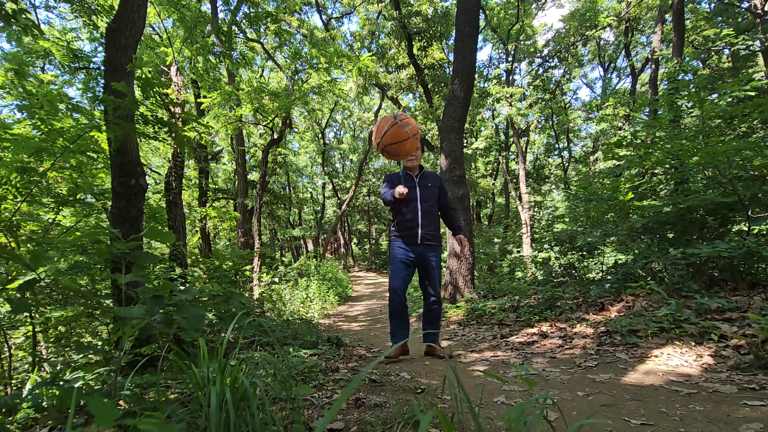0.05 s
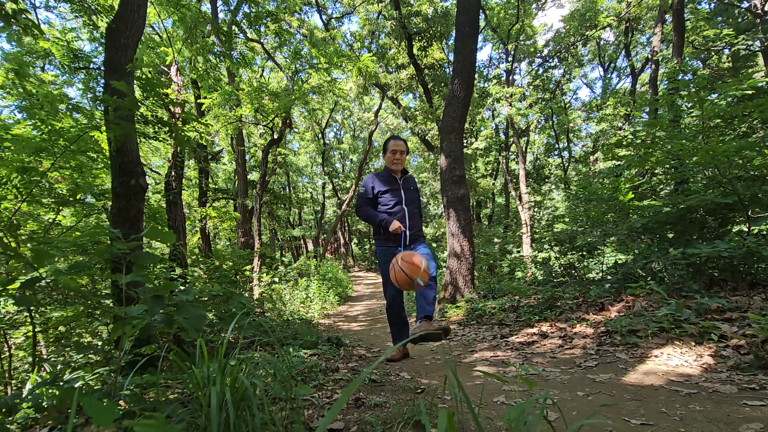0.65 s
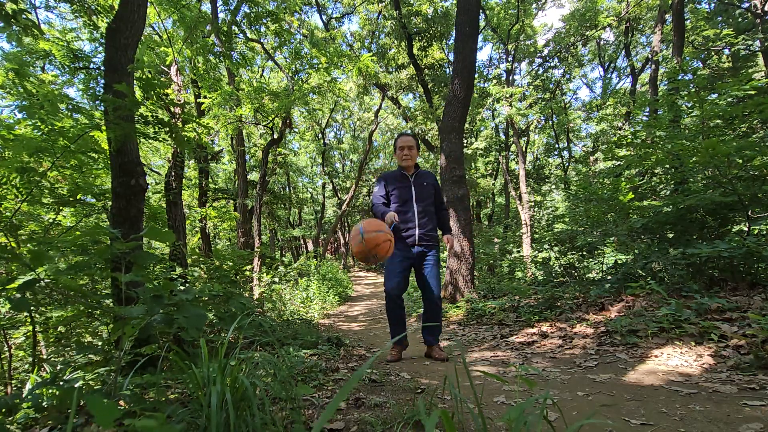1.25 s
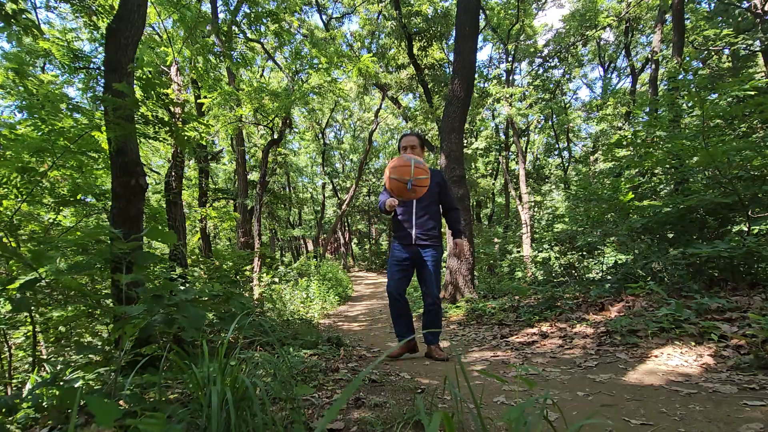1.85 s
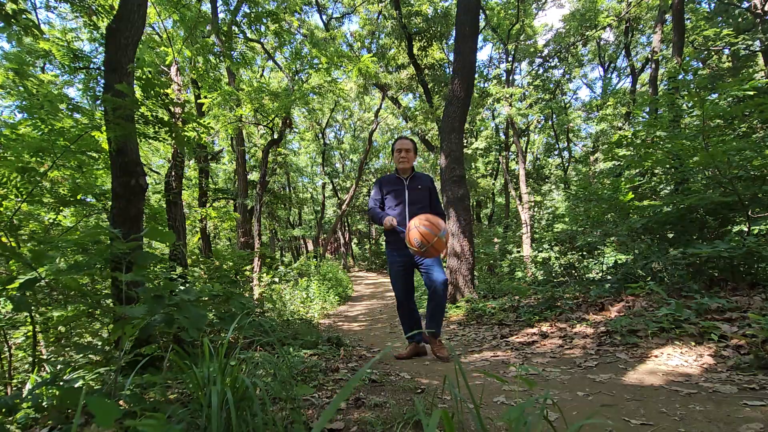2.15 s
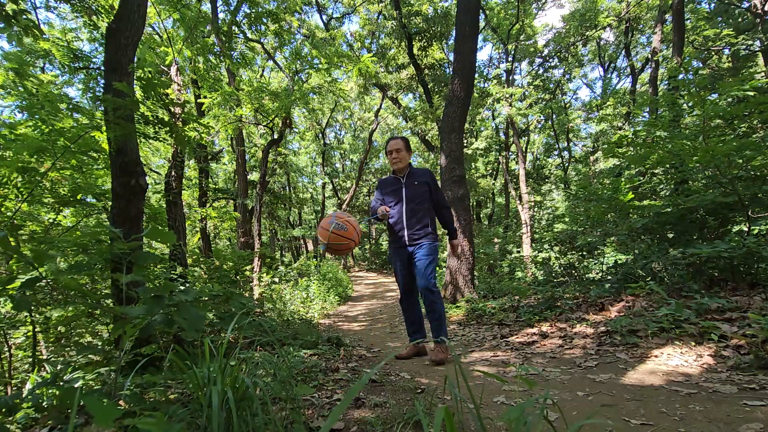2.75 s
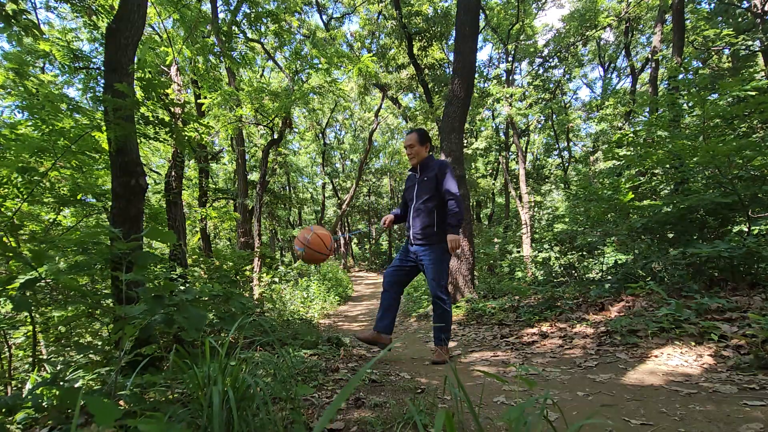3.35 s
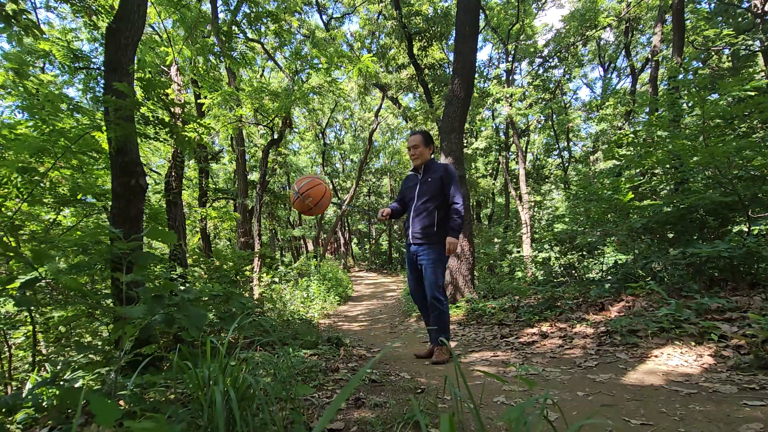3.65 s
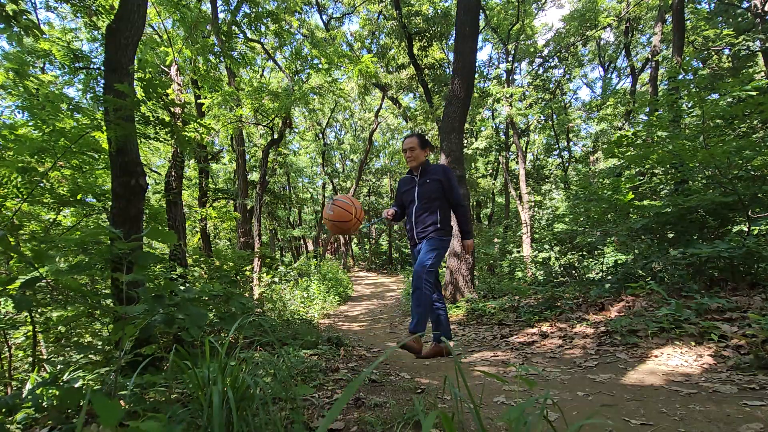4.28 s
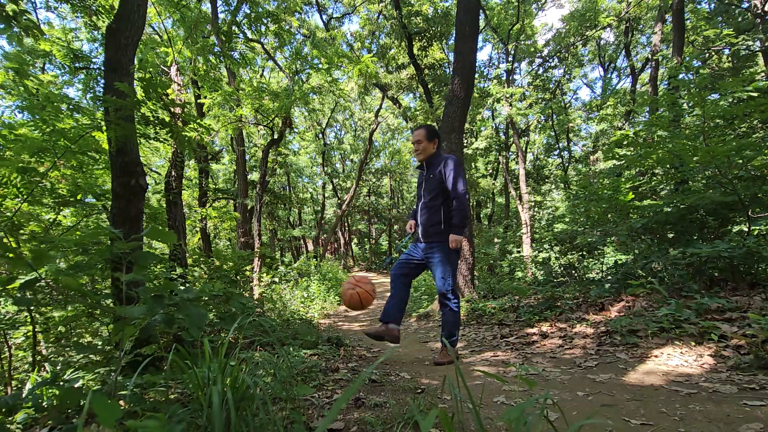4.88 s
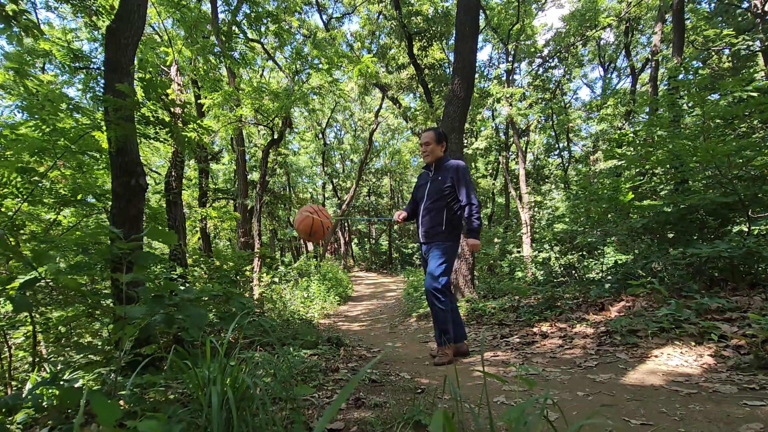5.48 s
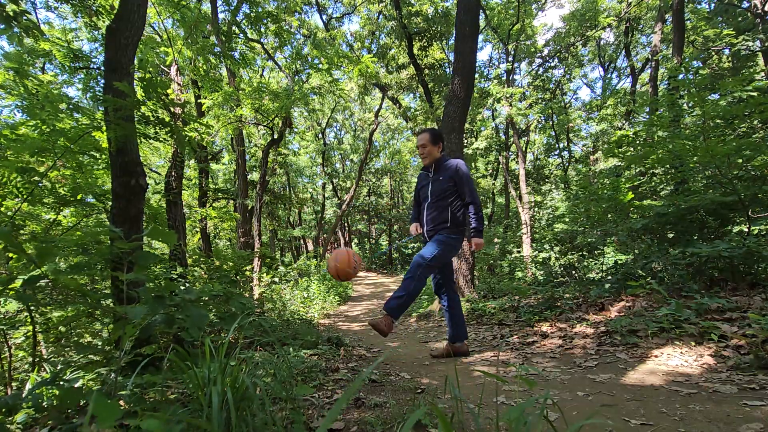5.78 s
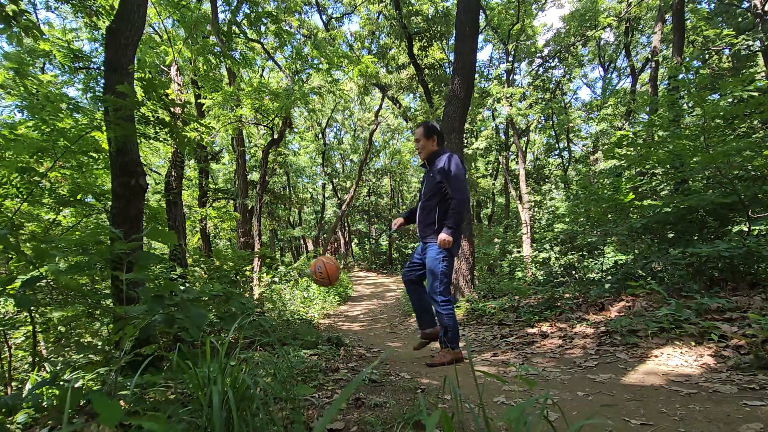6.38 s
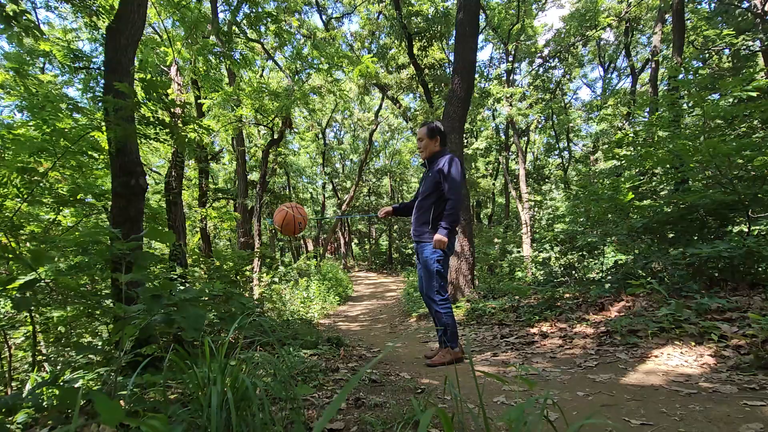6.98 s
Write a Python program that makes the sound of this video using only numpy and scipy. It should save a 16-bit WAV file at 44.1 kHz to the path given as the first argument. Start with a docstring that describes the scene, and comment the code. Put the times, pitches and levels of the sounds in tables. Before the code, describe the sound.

A basketball is kicked eight times in a steady rhythm, each a sharp slap and thump, on a quiet forest trail with faint birds.

```python
"""A basketball hanging on a cord is kicked eight times in a steady rhythm by a man on a forest trail.
Each kick is a leathery slap, a deep thump as the shoe dents the rubber, and a faint ping of the air
inside; undergrowth and trunks scatter it back. Between kicks the cord snaps taut with a dull tug,
and his nylon jacket sleeve rustles. Twigs and dry leaves tick underfoot, and thin birds call over
hissing leaves and a distant rumble."""
import sys
import numpy as np
from scipy import signal
from scipy.fft import rfft, irfft, next_fast_len
from scipy.io import wavfile
from scipy.ndimage import map_coordinates

SR = 44100
rng = np.random.default_rng(int(sys.argv[2]) if len(sys.argv) > 2 else 0)


def master_out(mix):
    """Clip the mix to full scale and print it as 16-bit PCM to the path in sys.argv[1]."""
    frames = np.transpose(np.atleast_2d(mix))
    ceiling = np.clip(frames, -1, 1)
    pcm = np.round(ceiling * 32767).astype(np.int16)
    wavfile.write(sys.argv[1], SR, pcm)


N = 314433
CONTACT_S = 0.0167  # how long the shoe touches the ball


def kicks():
    """Each kick layers a slap, a thump and a knock, then the rubber shell and the air inside ring on."""
    # (time [s], strength [dB], shoe angle [0 flat, 1 toe], shell ring [dB], ping [dB],
    #  ping tilt [dB/octave], ping sustain [factor])
    blows = [(0.6804, -15.5, 0.4, -40, -40, -8, 1.1), (1.5615, -17, 0.11, -30.5, -42, -11, 1.04),
             (2.4174, -20.5, 0.29, -34, -43.5, -10, 0.66), (3.243, -19.5, 0, -28, -49, -4, 0.65),
             (4.1002, -18, .95, -25, -52, -24, 1.2), (4.9292, -17.5, 0.05, -27.5, -54, -2, 0.55),
             (5.7948, -19, 1, -32, -58.5, -12, 6.2), (6.616, -17.3, 0.61, -41, -44, 7, 0.34)]
    # modes of the rubber shell: (frequency [Hz], relative level [dB], t60 [s])
    shell_modes = [(229.6, -2.5, 0.083), (296.8, 1.5, 0.15), (374, -1, 0.065), (508, -2, 0.07),
                   (590, -1.5, 0.059), (825, -2.5, 0.079), (1040, -6, 0.055)]
    out, t = np.zeros((2, N)), np.arange(SR) / SR
    for start, db, toe, shell_db, ping_db, tilt_db, sustain in blows:
        slap, slap_all_round = shoe_slap(t, db, toe)
        boom = amp(db + 10) * thump(t - by_shoe(toe, 0.0033, 0.0045))  # the toe sinks in later
        knock = rubber_knock(t, db, toe)
        shell = amp(shell_db) * ring(t - 0.0075, shell_modes, scatter_db=3)
        ping = air_ping(t, ping_db, tilt_db, sustain)
        body = boom + knock + shell
        all_round = slap_all_round + amp(-5.5) * body + amp(-2.5) * ping
        add(out, start - 0.001, on_trail(slap + body + ping, all_round))
    return out


def shoe_slap(t, db, toe):
    """Shoe on rubber: the flat slaps, the toe cracks. Gives the direct sound and that sent all round."""
    # leathery body of the slap: (frequency [Hz], relative level [dB])
    slap_spectrum = [(150, -22), (400, 8.5), (700, -0.5), (1300, -1), (1600, -2), (1900, -10.5),
                     (3000, -23.5), (9000, -41)]
    # sizzle on top of it: (frequency [Hz], relative level [dB])
    sizzle_spectrum = [(2500, -40), (4500, -14), (5600, -3.5), (7500, -1), (9000, -11), (11500, -12),
                       (13000, -16), (16000, -25)]

    def skin_db(hz):
        slap = amp(by_shoe(toe, 28, 18.5) + along(slap_spectrum, hz))
        crack = amp(by_shoe(toe, 20, 25.5) + hump(hz, by_shoe(toe, 3380, 2710), focus_db=24.5))
        sizzle = amp(by_shoe(toe, 10, 13) + along(sizzle_spectrum, hz))
        return db + 20 * np.log10(slap + crack + sizzle)

    graze = amp(-8.5) * snap(swell(t, crest_s=0.0013))
    strike = snap(swell(t - 0.0013, crest_s=0.0014), passes=1)
    release_scuff = amp(-18.5) * snap(swell(t - CONTACT_S * 0.676, crest_s=0.0029))
    direct = coloured(graze + strike + release_scuff, skin_db)
    all_round = coloured(1.0 * (t == 0), skin_db)  # summed over all directions, the spectrum is smooth
    return direct, all_round


def thump(t):
    """The shoe dents the ball and lets go; the air feels the acceleration of the dent."""
    stiffness, skew, low_cut_hz = 3.92, 0.85, 56
    progress = np.clip(t / CONTACT_S, 0, 1)
    dent = np.abs(np.sin(np.pi * progress ** skew)) ** stiffness
    push = np.gradient(np.gradient(dent))
    push = signal.sosfilt(signal.butter(2, low_cut_hz, "high", fs=SR, output="sos"), push)
    return push / np.abs(push).max()


def rubber_knock(t, db, toe):
    """The rubber under the shoe buckles inwards, heavily damped, and flaps back as the ball leaves."""
    thud_db, knock_db = db + by_shoe(toe, -4.5, 7), db + by_shoe(toe, -5, -4)
    # modes of the struck patch: (frequency [Hz], level [dB], t60 [s])
    patch_modes = [(225, thud_db, 0.022), (410, thud_db - 4, 0.018),
                   (520, knock_db - 3, 0.018), (809, knock_db + 5.5, 0.022)]
    buckle = -ring(t - 0.0014, patch_modes, scatter_db=1.5)
    release = swell(t - CONTACT_S * 0.55, crest_s=0.0046)
    flap = amp(knock_db - 9.5) * burst(release, lambda hz: hump(hz, centre_hz=583, focus_db=12.5))
    return buckle + flap


def air_ping(t, db, tilt_db, sustain):
    """The air trapped in the ball rings, wavering as the ball turns in flight."""
    # air modes: (frequency [Hz], relative level [dB], t60 before the sustain factor [s])
    air_modes = [(795, -1, 0.3), (1614, 6.5, 0.26), (2116, -11, 1.5), (2170, -1, 0.27), (2800, -17, 0.93),
                 (3208, -22, .25)]
    tilt_above_hz = air_modes[1][0]
    modes = [(hz, level + tilt_db * np.log2(max(hz / tilt_above_hz, 1)), t60 * sustain)
             for hz, level, t60 in air_modes]
    flutter_db = 1.9 * wobble(26)[:len(t)]
    return amp(db - 4 + flutter_db) * ring(t - 0.0025, modes, scatter_db=1.5)


def cord_and_sleeve():
    """The cord snaps taut with a dull tug, and his jacket sleeve rustles."""
    # (time [s], rustle length [s], rustle [dB], tug [dB], rustle crest [share of length])
    jerks = [(0.222, 0.033, -48.5, -45, .4), (1.115, 0.057, -43, -42.5, 0), (2.007, 0.046, -45, -43.5, .75),
             (2.88, 0.07, -45.5, -45.5, 0.67), (3.706, 0.057, -45.5, -43.5, 0.4),
             (4.557, 0.058, -39.5, -52, 0.27), (5.436, 0.05, -56, -44.5, 0.7),
             (6.216, 0.042, -39, -40, .15), (7.065, 0.043, -49.5, -33.5, 0.2)]
    # colour of the tug: (frequency [Hz], relative level [dB])
    tug_spectrum = [(60, 9.5), (150, 1), (350, -4.5), (650, -3), (1500, -19), (5000, -36), (16000, -47)]
    out, t = np.zeros((2, N)), np.arange(SR // 2) / SR
    for start, length, rustle_db, tug_db, crest in jerks:
        rustle = sleeve_rustle(t / length, rustle_db, crest)
        tug = amp(tug_db + 4) * burst(swell(t, crest_s=0.0032), lambda hz: along(tug_spectrum, hz))
        add(out, start, on_trail(rustle + tug, rustle + tug))
    return out


def sleeve_rustle(progress, db, crest):
    """The nylon sleeve swishes: a broad, grainy rasp with a narrow band that stands out at its crest."""
    # colour of the rasp before its tilt: (frequency [Hz], relative level [dB])
    rasp_spectrum = [(120, 1.5), (400, 4.5), (900, -3), (1400, 1), (2200, -3.5), (3200, -2.5), (6000, -9.5),
                     (9500, -11), (12000, -19.5), (16000, -22)]
    tilt_db_per_octave = -0.62
    rasp_colour = lambda hz: along(rasp_spectrum, hz) + tilt_db_per_octave * np.log2(hz + 1)
    stages = [0, 0.06, np.clip(crest, 0.1, 0.88), 0.9, 1.15]
    swish = np.interp(progress, stages, [0.11, 0.38, 1, 0.41, 0.026])
    grain = amp(4.04 * wobble(356)[:len(progress)])
    rasp = amp(db - 1.2) * burst(swish * grain, rasp_colour)
    band = amp(db - 5) * burst(swish ** 2 * grain, lambda hz: hump(hz, centre_hz=2040, focus_db=113))
    return rasp + band


def litter():
    """Twigs and dry leaves tick as he shifts his feet; the louder the snap, the shorter it is."""
    # (time [s], relative level [dB], centre frequency [Hz])
    ticks = [(0.497, -52, 6000), (1.253, -48, 7500), (1.418, -62.5, 9000), (2.1, -59, 7000),
             (3.112, -60, 11000), (3.922, -45.5, 7040), (5.009, -30, 3000), (5.641, -37.5, 6400),
             (6.714, -51, 3470)]
    loud_crest_s, loud_db, db_per_doubling = 0.00097, -25, 16
    out, t = np.zeros((2, N)), np.arange(SR // 4) / SR
    for start, db, centre_hz in ticks:
        crest_s = loud_crest_s * 2 ** ((loud_db - db) / db_per_doubling)
        tick = amp(db - 9.5) * burst(swell(t, crest_s), lambda hz: hump(hz, centre_hz, focus_db=11))
        add(out, start, on_trail(tick, amp(-2) * tick))
    return out


def birds():
    """Far birds give thin falling whistles, blurred by their way through the trees."""
    # (time [s], length [s], pitch [Hz], relative level [dB])
    calls = [(0, 0.15, 7360, -72), (1.474, .1, 4520, -66), (1.64, .26, 7230, -70.5),
             (1.675, 0.34, 2540, -58.5), (1.694, .34, 4320, -65), (2.56, .24, 6970, -76),
             (3.36, 0.19, 7450, -72), (3.55, 0.19, 5400, -69), (5.87, .15, 7800, -73),
             (5.996, 0.35, 7400, -70), (6.079, 0.22, 2950, -58.5), (6.829, .22, 8100, -71)]
    # smear around each whistle: (pitch [Hz], half-width [Hz])
    blur = [(2800, 440), (5400, 80), (7500, 70)]
    fall_hz_per_s = 1100
    out = np.zeros((2, N))
    for start, length, pitch_hz, db in calls:
        n = int(length * SR)
        glide_hz = pitch_hz - fall_hz_per_s * (np.arange(n) / SR - length / 2)
        whistle = np.exp(2j * np.pi * np.cumsum(glide_hz) / SR)
        blur_hz = along(blur, pitch_hz)
        paths = filtered(rng.standard_normal((2, 2, n)), lambda hz: 1 / (1 + (hz / blur_hz) ** 2))
        call = np.real((paths[0] + 1j * paths[1]) * whistle)
        fade = np.sin(np.linspace(0, np.pi, n))
        add(out, start, amp(db - 3.5) * unit(call) * fade)
    return out


def forest():
    """A steady distant rumble under the soft hiss of leaves, which follows the breeze."""
    # colour of the rumble: (frequency [Hz], relative level [dB])
    rumble_spectrum = [(12, -52), (20, -11.5), (43, -3.5), (70, -0.5), (135, -11.5), (242, -15), (273, -18),
                       (437, -32), (500, -29), (650, -45), (1100, -120)]
    # colour of the leaves: (frequency [Hz], relative level [dB])
    leaf_spectrum = [(200, -14), (450, 2.5), (800, -3), (1300, -1.5), (2100, -6), (3000, -12.5),
                     (4300, -13), (5500, -19.5), (7500, -21), (9500, -23.5), (10700, -33.5), (16000, -32)]
    # rise and fall of the hiss: (time [s], relative level [dB])
    breeze = [(0.0, -61.5), (1.63, -61), (4.29, -61), (6.19, -58.5), (7.13, -59.5)]

    def bed(spectrum):
        noise = diffuse(rng.standard_normal((2, N)))
        return unit(filtered(noise, lambda hz: amp(along(spectrum, hz))))

    hiss_db = np.interp(np.arange(N) / SR, *np.transpose(breeze))
    rumble = amp(-46 + wobble(5.6)) * bed(rumble_spectrum)
    hiss = amp(hiss_db + 1 + wobble(2.02) / 2) * bed(leaf_spectrum)
    return rumble + hiss


def on_trail(direct, all_round):
    """The direct sound goes straight to the microphone; undergrowth and trunks scatter the rest."""
    # stereo width of the direct sound: (frequency [Hz], side over mid [dB])
    width = [(200, -32), (500, -22), (1000, -20), (3000, -13.5), (5000, -5.5), (8000, -2.5), (14000, 1)]
    # decay of the near and far echoes: (frequency [Hz], t60 [s])
    undergrowth_decay = [(100, 0.19), (500, 0.14), (2500, 0.17), (8000, 0.15), (15000, 0.17)]
    trunk_decay = [(100, 0.8), (700, 0.76), (2500, 0.64), (6000, 0.56), (14000, 0.45)]
    # colour of those echoes: (frequency [Hz], level [dB])
    undergrowth_colour = [(80, -30), (250, -4), (700, -7.5), (2500, -6.5), (7000, -3), (14000, 3)]
    trunk_colour = [(80, -21.5), (250, -25.5), (800, -17), (2500, -15), (7000, -9.5), (14000, -11)]
    # the microphone's two ports differ in phase
    side = filtered(direct, lambda hz: -1j * amp(along(width, hz)))
    near = echo_tail(undergrowth_decay, undergrowth_colour, onset_s=0.0023)
    far = echo_tail(trunk_decay, trunk_colour, onset_s=0.033)
    echoes = signal.fftconvolve(all_round[None], near + far, axes=1)[:, :len(direct)]
    return np.array([direct + side, direct - side]) + echoes


def echo_tail(decay, colour, onset_s):
    """A stereo echo whose frequencies die at their own speeds."""
    hz, t, noise = signal.stft(rng.standard_normal((2, SR)), SR, nperseg=256)
    t60 = along(decay, hz)[:, None]
    equal_energy = np.sqrt(np.log(10 ** 6) / (t60 * SR))
    gain = amp(along(colour, hz)[:, None] - 60 * t / t60) * equal_energy
    echo = signal.istft(noise * gain, SR, nperseg=256)[1][:, :SR]
    fade_in = 1 - np.exp(-(np.arange(SR) / SR / onset_s) ** 2)
    return diffuse(echo * fade_in)


def diffuse(pair):
    """Two unrelated signals become a field that is near mono in the bass and wide in the treble."""
    # (frequency [Hz], left-right correlation [-1 to 1])
    likeness = [(60, 0.96), (180, 0.96), (550, 0.46), (1650, -0.21), (4970, 0.1), (15000, -0.074)]
    angle = lambda hz: np.arccos(along(likeness, hz)) / 2
    mid, side = filtered(pair, lambda hz: np.array([np.cos(angle(hz)), np.sin(angle(hz))]))
    return np.array([mid + side, mid - side])


def by_shoe(toe, flat_value, toe_value):
    """Blend a setting from the flat of the shoe (0) to its toe (1)."""
    return np.interp(toe, [0, 1], [flat_value, toe_value])


def ring(t, modes, scatter_db):
    """Damped modes, struck at new strengths; neighbours swing in opposite directions."""
    t = np.maximum(t, 0)
    out = np.zeros(len(t))
    for k, (hz, db, t60) in enumerate(modes):
        envelope = amp(db + scatter_db * rng.standard_normal() - 60 * t / t60)
        out += (-1) ** k * envelope * np.sin(2 * np.pi * hz * t)
    return out


def snap(envelope, passes=3):
    """A brief noise of energy 1; each pass evens out the holes in its spectrum."""
    x = rng.standard_normal(len(envelope))
    for _ in range(passes):
        spectrum = rfft(x * np.sqrt(envelope))
        x = irfft(spectrum / (np.abs(spectrum) + 1e-9), len(x))
    x = x * np.sqrt(envelope)
    return x / np.linalg.norm(x)


def burst(envelope, level_db):
    """Coloured noise whose rms follows the envelope."""
    x = coloured(envelope * rng.standard_normal(len(envelope)), level_db)
    return x * np.linalg.norm(envelope) / (np.linalg.norm(x) + 1e-12)


def swell(t, crest_s):
    """Rises from t = 0 to 1 at the crest and dies away."""
    u = np.maximum(t, 0) / crest_s
    return (u * np.exp(1 - u)) ** 2


def wobble(rate):
    """A smooth random curve, rate knots a second."""
    knots = rng.standard_normal(int(N * rate / SR) + 4)
    return map_coordinates(knots, [np.arange(N) * rate / SR])


def coloured(x, level_db, size=2048):
    """Causal filter with the gain level_db(Hz), so that nothing sounds before a blow."""
    cepstrum = irfft(level_db(np.fft.rfftfreq(size, 1 / SR)) * np.log(10) / 20)
    cepstrum[1:size // 2] *= 2
    cepstrum[size // 2 + 1:] = 0
    impulse_response = irfft(np.exp(rfft(cepstrum)))
    return signal.fftconvolve(x, impulse_response)[:len(x)]


def filtered(x, response):
    """Shape the spectrum of x by the gain response(Hz)."""
    n = x.shape[-1]
    size = next_fast_len(n + SR // 4)
    return irfft(rfft(x, size) * response(np.fft.rfftfreq(size, 1 / SR)), size)[..., :n]


def hump(hz, centre_hz, focus_db):
    """A peak in dB that falls by focus_db times the squared distance in octaves, 45 dB at most."""
    return -np.minimum(focus_db * np.log2((hz + 1) / centre_hz) ** 2, 45)


def along(points, hz):
    """Read a curve of (frequency [Hz], value) points on a log axis."""
    frequencies, values = np.transpose(points)
    return np.interp(np.log(hz + 1), np.log(frequencies), values)


def amp(db):
    """Decibels to gain."""
    return 10 ** (np.asarray(db) / 20)


def unit(x):
    """Scale to rms 1."""
    return x / np.sqrt(np.mean(x ** 2) + 1e-20)


def add(track, start_s, x):
    """Mix x into the track from start_s on."""
    i = max(round(start_s * SR), 0)
    track[..., i:i + x.shape[-1]] += x[..., :N - i]


def scene():
    """Everything on the trail, a little louder on the left."""
    # (frequency [Hz], left over right [dB])
    balance = [(60, 1.5), (500, 1), (1500, 0.5), (5000, -0.2), (9000, 4), (14000, 0.5)]
    mix = kicks() + cord_and_sleeve() + litter() + birds() + forest()
    return filtered(mix, lambda hz: amp(np.outer([0.5, -0.5], along(balance, hz))))


def record(dry):
    """Cut everything above the microphone's band limit."""
    top_hz = 16200
    return filtered(dry, lambda hz: hz < top_hz)


dry = scene()
out = record(dry)
master_out(out)
```